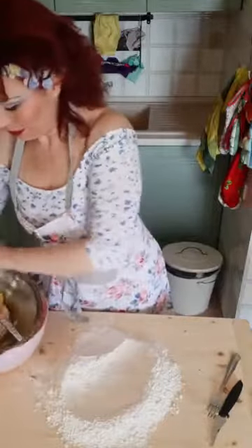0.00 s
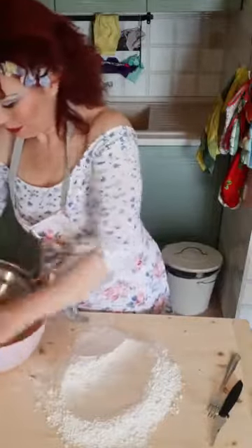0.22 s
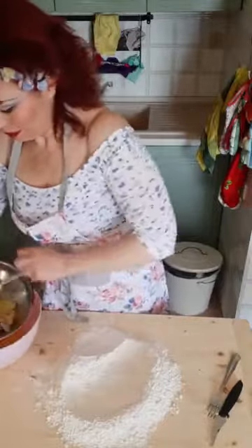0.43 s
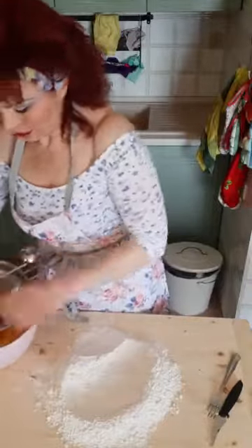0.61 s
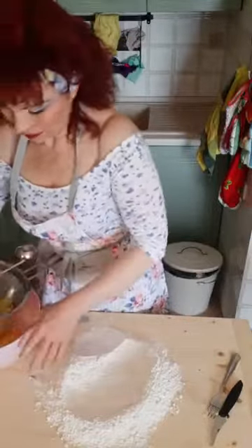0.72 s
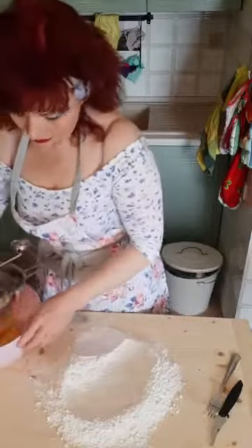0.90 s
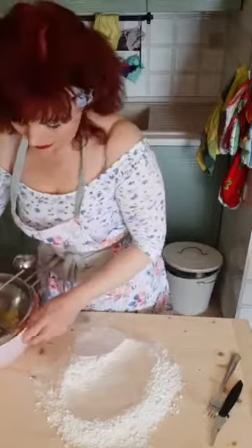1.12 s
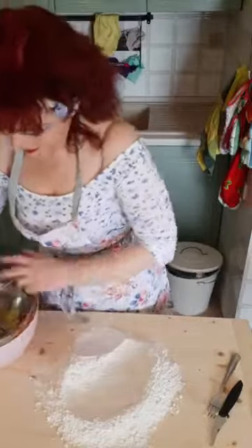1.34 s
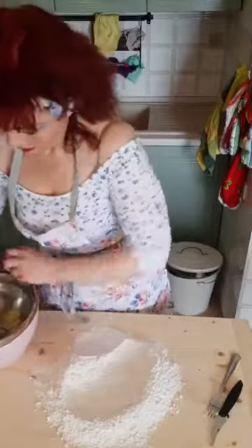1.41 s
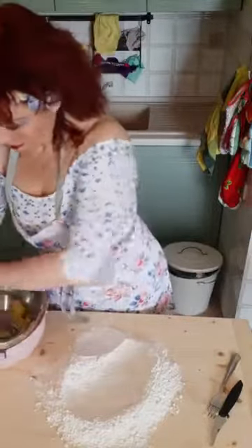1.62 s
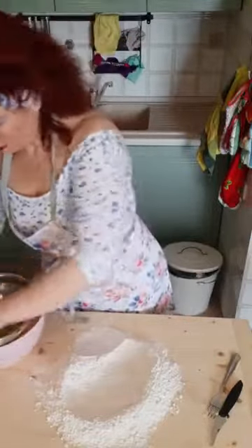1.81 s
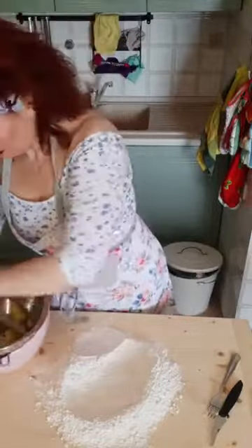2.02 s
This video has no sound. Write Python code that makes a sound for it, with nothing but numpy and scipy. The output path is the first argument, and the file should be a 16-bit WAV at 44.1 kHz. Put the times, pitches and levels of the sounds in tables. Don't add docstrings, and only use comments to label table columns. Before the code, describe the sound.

Hollow bowl dragged and set down on a wooden table, metal parts clinking and rasping inside

```python
import sys
import numpy as np
from scipy import signal
from scipy.fft import rfft, irfft
from scipy.io import wavfile
from scipy.ndimage import uniform_filter1d

SR = 44100
rng = np.random.default_rng(int(sys.argv[2]) if len(sys.argv) > 2 else 0)


def elevation(decibels):
    levels = np.asarray(decibels, float)
    return 10 ** (levels / 20)


def wrap_up_sound(samples):
    columns = np.atleast_2d(samples).T
    tamed = np.clip(columns, -1, 1)
    steps = np.round(tamed * 32767).astype(np.int16)
    wavfile.write(sys.argv[1], SR, steps)


N = 92610


def evened(x):
    return x / np.sqrt(np.mean(x ** 2) + 1e-20)


def unit(x):
    return x / np.linalg.norm(x, axis=-1, keepdims=True)


def read(points, hz):
    f, value = np.transpose(points)
    return np.interp(np.log(hz + 1), np.log(f + 1), value)


def add(mix, s, sound):
    part = mix[round(s * SR):][:len(sound)]
    part += sound[:len(part)]


def highpass(x, hz):
    return signal.sosfilt(signal.butter(2, hz, "high", fs=SR, output="sos"), x)


def minimum_phase(log):
    return np.exp(log - 1j * signal.hilbert(log).imag)


def colour(points, size=2048):
    log = np.log(elevation(read(points, abs(np.fft.fftfreq(size, 1 / SR)))))
    return unit(np.fft.ifft(minimum_phase(log)).real)


def flattened(x, smooth=14):
    z = np.fft.fft(x)
    log = -np.log(uniform_filter1d(abs(z) ** 2, size=smooth, axis=-1, mode="wrap")) / 2
    return np.fft.ifft(z * minimum_phase(log)).real


def burst(t, decay_s, smooth):
    noise = rng.standard_normal(len(t))
    return unit(flattened(noise * t * np.exp(-t / decay_s * 2), smooth=smooth))


def body(modes, broad, ring_db):
    t = np.arange(8192) / SR
    ring = np.zeros(len(t))
    for hz, width_hz, db in modes:
        decay = np.exp(-np.pi * width_hz * t)
        ring += elevation(db) * np.sqrt(width_hz) * decay * np.sin(2 * np.pi * hz * t)
    out = elevation(ring_db) * unit(ring)
    add(out, 0, colour(broad))
    return unit(out)


def grains(per_s, spread_db):
    size = elevation(spread_db * np.minimum(rng.exponential(1, N), 4)) * rng.choice([-1., 1.], N)
    return evened(size * (rng.random(N) < per_s / SR))


def fizz_band():
    t = np.arange(-40, 41) / SR
    centre_hz, width_hz = 12800, 8500
    return unit(np.exp(-(np.pi * width_hz * t) ** 2 / 2) * np.cos(2 * np.pi * centre_hz * t))


# frequency in Hz, left-right likeness [limited to 0 to 1 after
LIKENESS = [(60, 0.87), (180, 0.94), (550, 0.89), (1650, -1.16), (4970, -0.09), (15000, -0.02)]
# frequency in Hz, left minus right in dB.
PORT_BALANCE = [(60, 0.5), (150, -1), (380, 0), (950, -1), (2380, 1.5), (5980, -6), (15000, -11.5)]


def pair(a, b, even=lambda x: x):
    hz = np.fft.rfftfreq(len(a), 1 / SR)
    same = np.clip(read(LIKENESS, hz), 0, 1)
    tilt = elevation(read(PORT_BALANCE, hz) / 2)
    right = irfft(same * rfft(a) + np.sqrt(1 - same ** 2) * rfft(b), len(a))
    both = even(np.array([a, right]))
    return irfft(rfft(both) * [tilt, 1 / tilt], len(a))


# frequency in Hz, 60 dB decay time in seconds.
REVERB_TIME = [(100, 0.6), (260, 0.16), (520, 0.42), (800, 0.47), (1840, 0.3), (4850, 0.36), (12800, 0.22)]


def kitchen(x, near):
    room_db, gap_s = 5.5, 0.007
    reflections = np.zeros((2, SR))
    at = np.arange(300 + round(gap_s * SR), SR - 20, 20)
    spots = at + rng.integers(0, 20, (2, len(at)))
    np.put_along_axis(reflections, spots, rng.choice([-1., 1.], (2, len(at))), 1)
    hz, t, z = signal.stft(reflections, SR, nperseg=256)
    decay = elevation(-60 * t / read(REVERB_TIME, hz)[:, None])
    tail = elevation(room_db) * unit(signal.istft(z * decay, SR, nperseg=256)[1])
    direct = np.zeros(tail.shape)
    direct[0, [304, 352, 391]] = [.8, .45, -.4]
    direct[1, [300, 331, 367]] = [.7, -.5, .5]
    out = signal.fftconvolve(x[None], pair(*(tail + direct), flattened), axes=1)
    out = out + signal.fftconvolve(near[None], pair(*direct), axes=1)
    return out[:, 300:N + 300]


# frequency in Hz, level in dB per Hz.
AIR_SPECTRUM = [(15, -10.5), (25, 11), (515, -4.5), (908, -2), (1070, 6.5), (2750, -6.5), (4980, -5),
                (7460, -20.5), (15900, -14.5)]


def air():
    noise = rng.standard_normal((2, N))
    a, b = signal.oaconvolve(noise, colour(AIR_SPECTRUM, size=8192)[None], axes=1)[:, :N]
    return elevation(-63.5) * pair(a, b)


# start in seconds, level in dB, pitch in Hz.
TABLE_SHAKES = [
    (.15, -63, 45.7),
    (0.302, -52, 58.7),
    (.41, -84, 46.3),
    (0.599, -44, 41.8),
    (1.203, -52, 91.2),
    (1.302, -53.5, 43.2),
    (1.722, -57, 59.7),
    (1.873, -53, 46.2),
]


def table():
    out, t, shake_s = np.zeros(N), np.arange(18000) / SR, 0.045
    for s, db, hz in TABLE_SHAKES:
        decay = np.exp(-t / shake_s)
        ring = np.sin(2 * np.pi * hz * t) + 1.3 * np.sin(2 * np.pi * 2.7 * hz * t) * decay
        add(out, s, elevation(db + 7.5) * t / shake_s * decay * ring)
    return out


# start in seconds, level in dB, pitch in Hz, fizz in dB, ring in dB.
METAL_CLINKS = [(0.0627, -28.5, 2730, -3, -5), (0.0941, -24.5, 2620, -13, 5.5), (0.159, -29, 3000, 2, 6),
                (0.2309, -18.5, 1880, 4, -13), (0.2754, -13.5, 1980, 0.5, 3), (0.3292, -15, 1680, 2, 1),
                (0.503, -19.5, 2080, -1, 1), (0.623, -23, 2440, -21, -2.5), (0.64, -34.5, 2650, -25, -6),
                (1.1975, -9, 1520, -15, -15), (1.5277, -43, 1580, 4, 7), (1.5743, -37.5, 3370, -3, 8),
                (1.6086, -28, 3100, -6, -20), (1.6724, -16.5, 3170, -36, 3), (1.683, -29, 2620, -19, -14)]


def clinks():
    contact_s, ping_s, tick_db = 0.0017, 0.0013, -9
    rattle, ping, fizz, t = np.zeros(N), np.zeros(N), np.zeros(N), np.arange(1500) / SR
    for s, db, hz, fizz_db, steel_db in METAL_CLINKS:
        strike = burst(t, contact_s, smooth=30)
        tone = unit(np.exp(-t / ping_s) * np.sin(2 * np.pi * hz * t))
        add(rattle, s, elevation(db + 14.5 + steel_db) * strike)
        add(ping, s, elevation(db + 14.0) * signal.oaconvolve(strike, tone))
        add(ping, s, elevation(db + 9.5 + fizz_db + tick_db) * np.diff(strike))
        add(fizz, s, elevation(db + 6.5 + fizz_db) * strike)
    return rattle, ping + np.convolve(fizz, fizz_band(), "same")


# frequency in Hz, bandwidth in Hz, level in dB.
STEEL_MODES = [(1790, 24, -29.5), (2132, 37, 8.5), (2620, 92, 0), (2800, 57, -7), (3130, 58, 6),
               (3235, 37, -41), (4130, 120, -33)]
# frequency in Hz, level in dB per Hz.
STEEL_RASP = [(530, -30), (900, -6.5), (2030, -1), (2430, -1.5), (2980, -5.5), (3450, -2.5), (9660, -21.5),
              (14900, -35.5), (15800, -56.5)]


def steel(drive):
    return signal.oaconvolve(drive, body(STEEL_MODES, STEEL_RASP, -8.5))[:N]


# start in seconds, level in dB, pitch in Hz, ring in seconds.
JUDDER_TAPS = [(.154, -44, 385, 0.0039), (.230, -30.5, 500, 0.0053), (.274, -22, 1890, 0.0019),
               (.300, -30, 268, 0.019), (0.331, -35, 895, 0.0064), (.3996, -10.5, 477, 0.003),
               (0.4027, -11.5, 1490, 0.0018), (0.412, -17, 1500, 0.0068), (.418, -15, 1120, 0.0035),
               (.421, -13, 525, .003), (.453, -15, 445, 0.0035), (0.567, -35, 524, 0.0041),
               (0.6049, -20.5, 522, 0.0079), (.679, -35, 540, 0.0039), (1.196, -19.5, 1520, .004),
               (1.207, -20, 1390, 0.0025), (1.216, -10.5, 1500, 0.009), (1.230, -13.5, 532, 0.0044),
               (1.236, -12, 1500, 0.0036), (1.262, -20, 404, 0.0085), (1.297, -18.5, 449, 0.0033),
               (1.312, -21, 1520, .005), (1.384, -34, 400, 0.003), (1.43, -36, 460, 0.02),
               (1.474, -35, 523, 0.0085), (1.484, -43, 454, 0.0024), (1.488, -40, 1020, 0.0046),
               (1.497, -36, 1350, 0.0035), (1.508, -42, 1100, .004), (1.532, -39, 371, 0.014),
               (1.589, -35, 381, 0.0096), (1.645, -35, 470, 0.0075), (1.68, -26, 1990, 0.0043),
               (1.702, -40, 2000, 0.0034), (1.720, -30, 2800, 0.0027), (1.736, -31, 486, .003),
               (1.737, -29, 2480, 0.0027), (1.750, -29, 595, 0.0012), (1.764, -23.5, 340, 0.003),
               (1.765, -32, 2600, 0.0027), (1.776, -30, 286, 0.0067), (1.79, -27, 420, 0.002),
               (1.805, -33, 365, 0.003), (1.825, -20, 390, 0.0029), (1.839, -28, 500, 0.006),
               (1.843, -27, 1060, 0.0065), (1.858, -29, 490, 0.0038), (1.873, -27, 514, 0.0067),
               (1.961, -39, 500, 0.0041)]


def taps():
    out, t = np.zeros(N), np.arange(3000) / SR
    for s, db, hz, ring_s in JUDDER_TAPS:
        u = t / max(ring_s, .001) * 2
        add(out, s, elevation(db) * u * np.exp(1 - u) * np.sin(2 * np.pi * hz * t))
    return out


# frequency in Hz, bandwidth in Hz, level in dB.
BOWL_MODES = [(217, 6.7, -10.5), (285, 12, -12.5), (363, 10, -20), (380, 14, -9), (451.8, 34, -2.5),
              (500, 11.4, -5), (512.6, 13.7, 6.5), (594.5, 37, 3), (709, 24, -8), (727, 33, -9),
              (791, 23, -5), (1200, 53, -22.5), (1450, 33, -8.5), (1500, 90, 0)]


def bowl_body(broad, ring_db):
    return body(BOWL_MODES, broad, ring_db)


# frequency in Hz, level in dB per Hz.
SLIDE_SPECTRUM = [(59, -26.5), (100, -9), (216, -23.5), (263, -6), (485, -1.5), (627, -6.5), (693, -6.5),
                  (3000, -20.5), (3900, -52.5), (6600, -120)]
# time in seconds, pressure in dB, metal rasp in dB above it,
# fizz in dB above it.
BOWL_DRAGS = [
    [(0.0, -34.5, -0.5, -26), (0.03, -46.5, -5.5, -12), (0.11, -36, -8, -23), (0.218, -31, -2, -16),
     (0.232, -26.5, 3.5, -15), (0.242, -29.5, -6, -28), (0.342, -29.5, 3, -20), (0.38, -36, -3.5, -18),
     (0.398, -16.5, -5, -42)],
    [(.6, -44, -7, -36), (.625, -37.5, -10.5, -50), (.66, -40, -19, -45), (.7, -61, -20, -45)],
    [(1.195, -15.5, -4.5, -32), (1.201, -21, -2.5, -27), (1.225, -22.5, -11, -38), (1.29, -37.5, -8, -40)],
    [(1.4, -38, -13, -43), (1.442, -44, -19, -40), (1.495, -48.5, -7.5, -39), (1.572, -52, 1.5, -6.5),
     (1.668, -32.5, -8, -28), (1.672, -35, 2.5, -15), (1.758, -31, -6.5, -17), (1.8, -32, -6.5, -16),
     (1.852, -38, -14.5, -36), (2.014, -56, -9, -26.5), (2.1, -60.5, 1, -12)],
]


def drags():
    t, gains = np.arange(N) / SR, np.zeros((3, N))
    for rows in BOWL_DRAGS:
        s, db, rasp_db, fizz_db = np.transpose(rows)
        levels = [np.interp(t, s, v) for v in (db, db + rasp_db, db + fizz_db)]
        gains += (t >= s[0]) * (t <= s[-1]) * elevation(levels)
    pressure, rasp, fizz = gains
    band = signal.butter(2, [40, 150], "band", fs=SR, output="sos")
    rumble = elevation(-31) * pressure * evened(signal.sosfilt(band, rng.standard_normal(N)))
    slips = pressure * grains(per_s=1000, spread_db=3.5)
    slide = signal.oaconvolve(slips, bowl_body(SLIDE_SPECTRUM, -5.5))[:N]
    grit = rasp * grains(per_s=2000, spread_db=6)
    fine = grains(per_s=8700, spread_db=3)
    hiss = fizz * [fine, fine[::-1]]
    return slide, grit, signal.oaconvolve(hiss, fizz_band()[None], "same", axes=1), rumble


# frequency in Hz, level in dB per Hz.
BOARD_SPECTRUM = [(35, -93), (60, -32.5), (115, -18.5), (179, -20), (453, -5), (559, -1), (613, -12.5),
                  (1520, -9.5), (15500, -54.5)]
# frequency in Hz, bandwidth in Hz, level in dB.
RIM_MODES = [(1106, 96, -10), (1450, 150, -6), (1500, 210, -6.5), (2060, 200, 4.5)]
# start in seconds, level in dB, edge in dB, contact in seconds.
BOWL_KNOCKS = [
    (0.4, -10.5, 2, 0.00095),
    (0.412, -31, -11, 0.0011),
    (0.422, -17, -12, 0.00078),
    (0.453, -30.5, 9, 0.0026),
    (0.606, -21, -6.5, 0.0017),
    (0.616, -29, 5.5, 0.0019),
    (1.199, -18.5, -7, 0.0015),
    (1.214, -16, -3, 0.0024),
    (1.229, -19, -3, 0.002),
    (1.483, -34.5, -11, 0.0012),
]


def knocks():
    push, t = np.zeros(N), np.arange(600) / SR
    for s, db, edge_db, contact_s in BOWL_KNOCKS:
        add(push, s + 0.001, elevation(db + 9.5) * -unit(np.exp(-t / contact_s * 10) * t))
        add(push, s + 0.001, elevation(db + 18.5 + edge_db) * burst(t, contact_s, smooth=8))
    response = bowl_body(BOARD_SPECTRUM, -1) + elevation(-13.5) * body(RIM_MODES, BOARD_SPECTRUM, 29)
    return signal.oaconvolve(push, response)[:N]


def scene():
    background = air()
    rattle, ping = clinks()
    jolts = taps()
    slide, grit, hiss, rumble = drags()
    bowl = knocks()
    low = table() + rumble
    wood = highpass(bowl + slide, 140)
    far = wood + steel(grit + rattle) + ping + 0.43 * hiss[0] + 0.5 * low + elevation(-14) * jolts
    near = 0.067 * ping + 0.1 * bowl + 0.74 * jolts
    return kitchen(far, near) + low + background + 0.39 * pair(*hiss)


def top_cut(x):
    return signal.sosfilt(signal.butter(12, 15900, fs=SR, output="sos"), x)


def record(dry):
    cut = highpass(dry, 44)
    edge = signal.firwin(511, 15700, window=("kaiser", 9), fs=SR)
    mix = signal.oaconvolve(cut, edge[None], "same", axes=1)
    return top_cut(mix)


dry = scene()
out = record(dry)
wrap_up_sound(out)
```